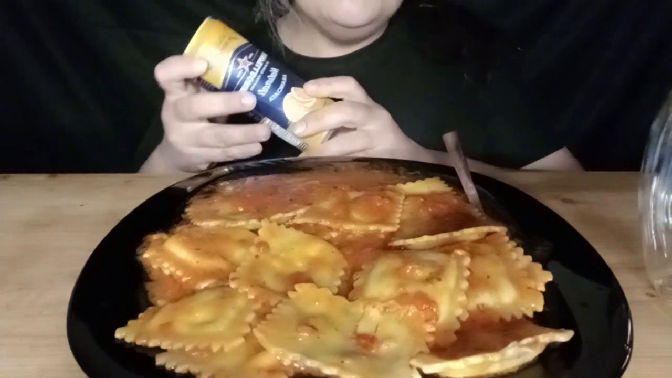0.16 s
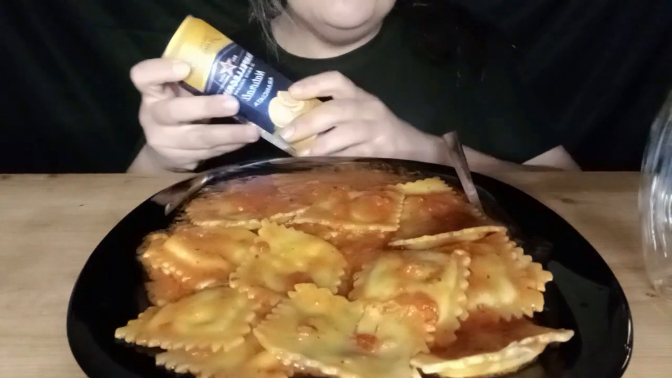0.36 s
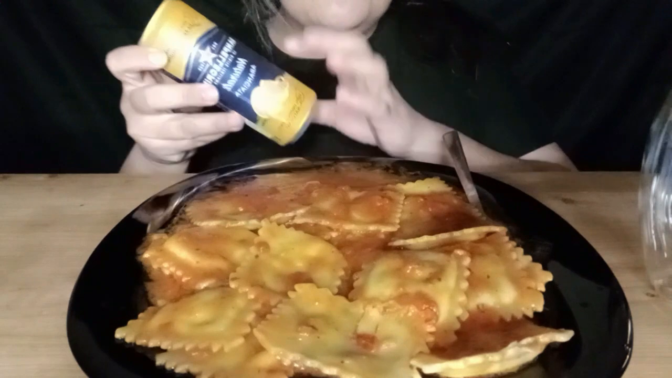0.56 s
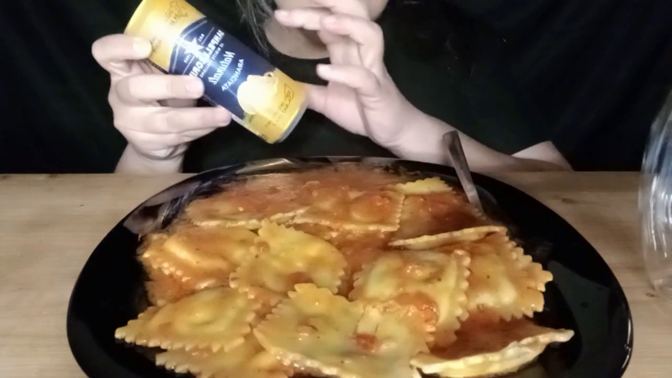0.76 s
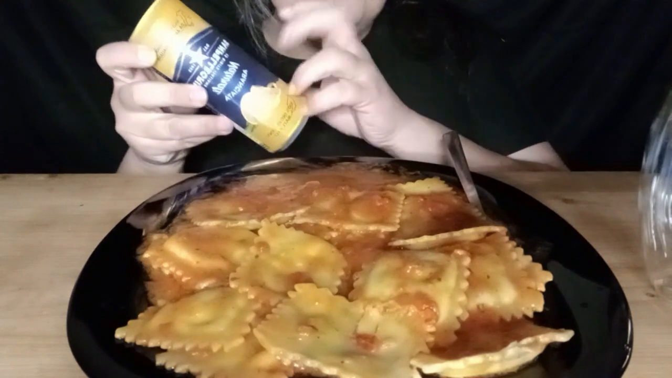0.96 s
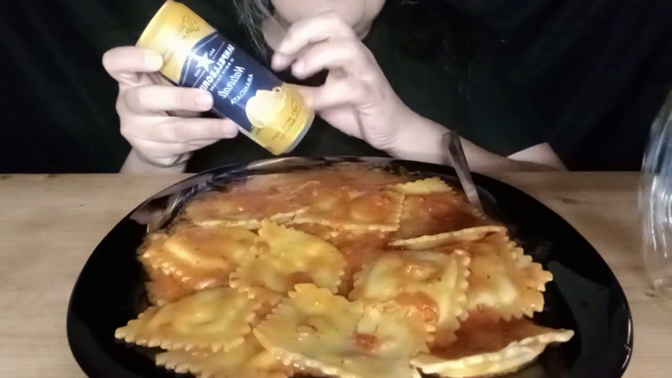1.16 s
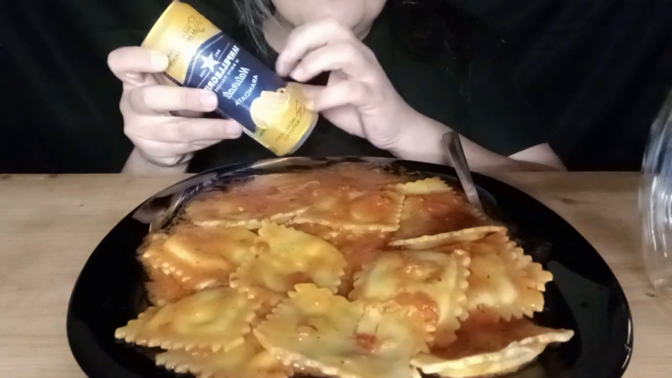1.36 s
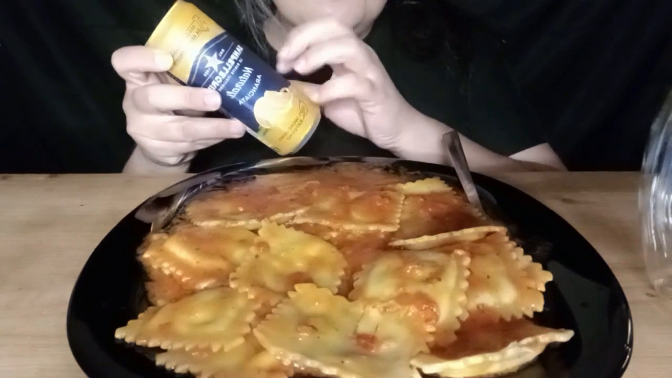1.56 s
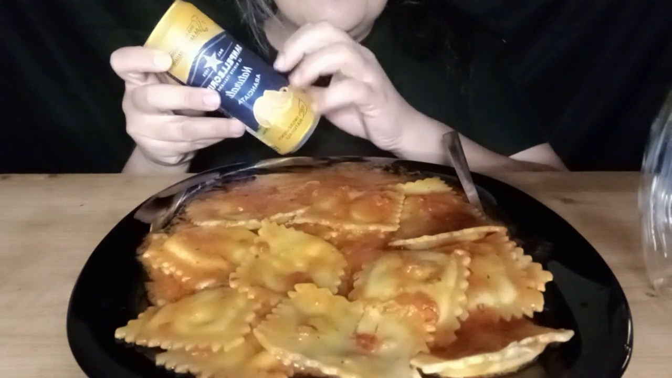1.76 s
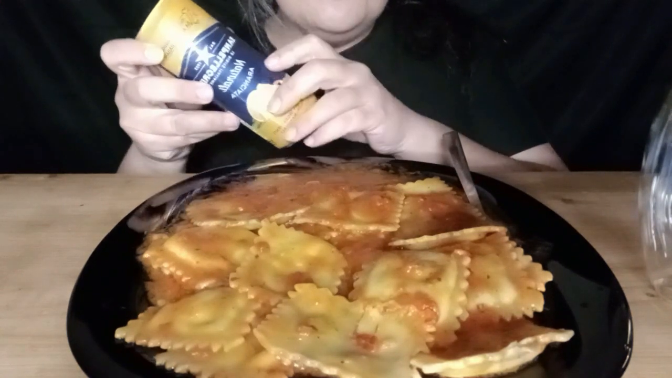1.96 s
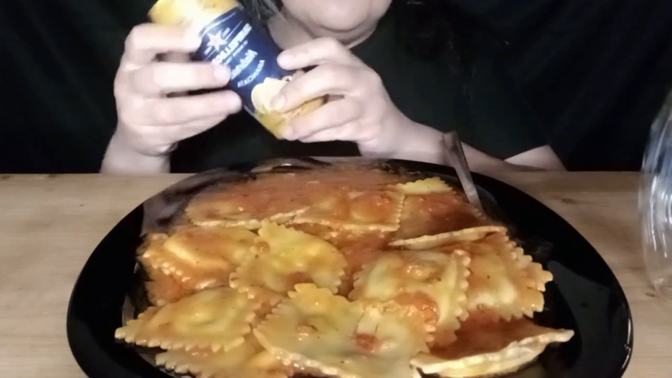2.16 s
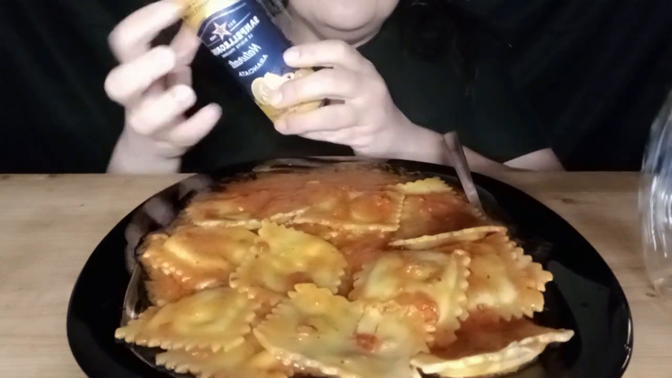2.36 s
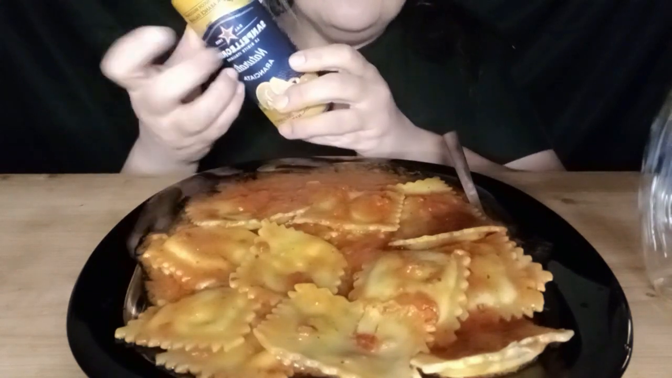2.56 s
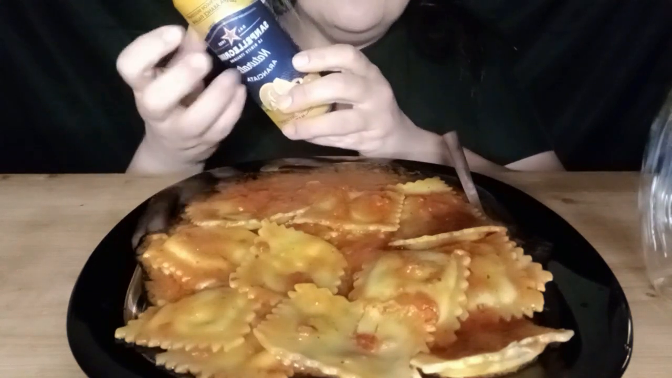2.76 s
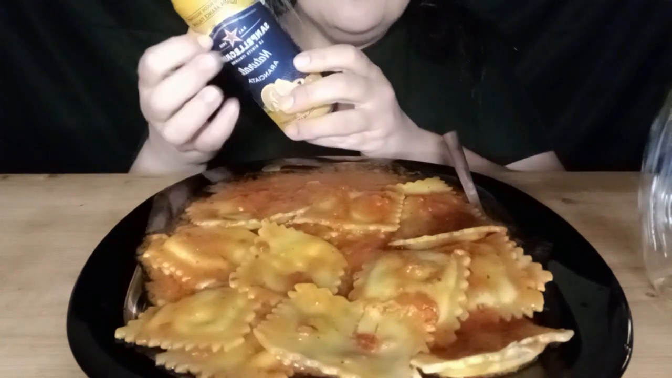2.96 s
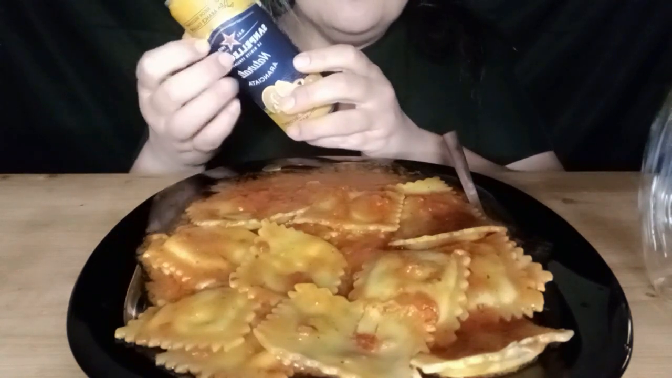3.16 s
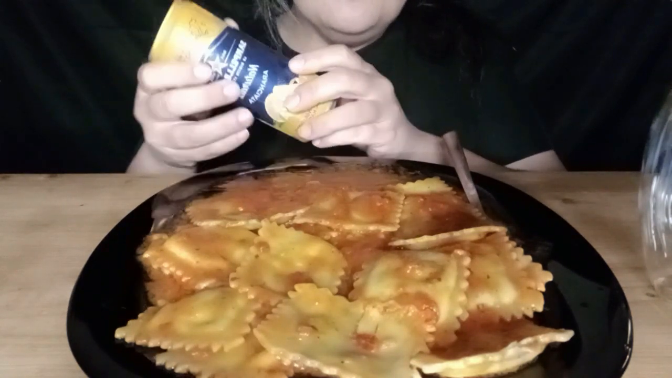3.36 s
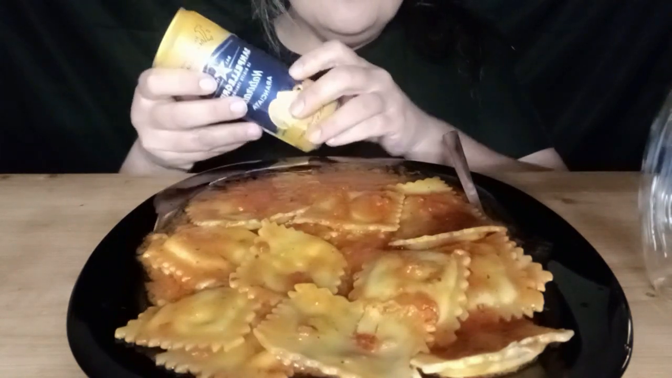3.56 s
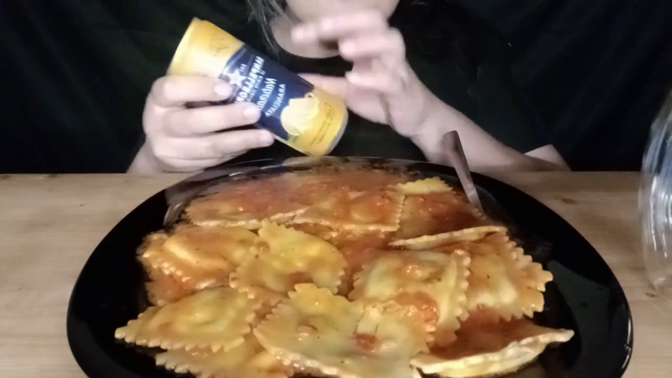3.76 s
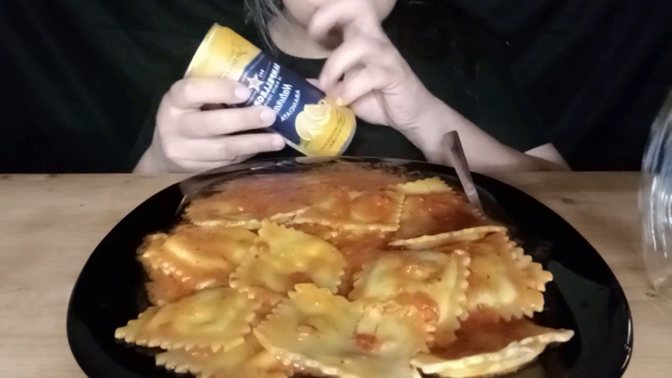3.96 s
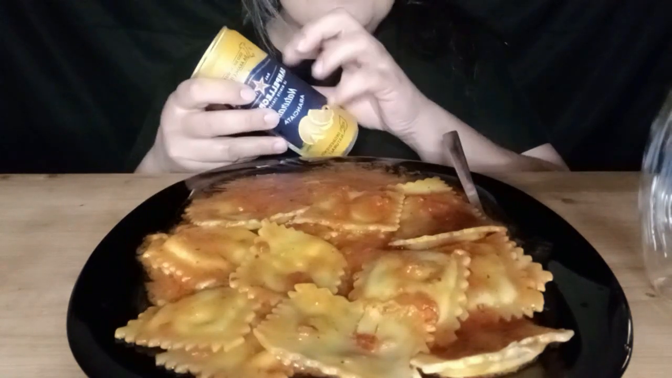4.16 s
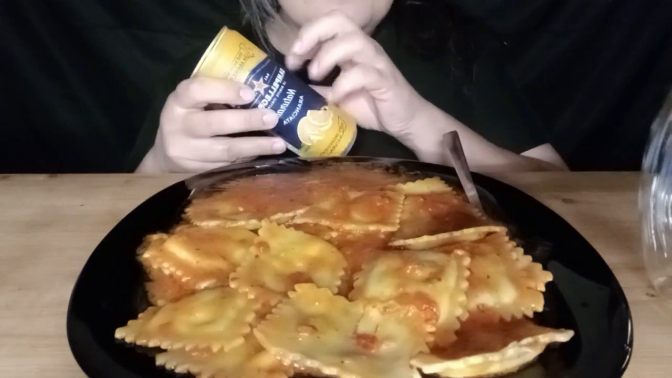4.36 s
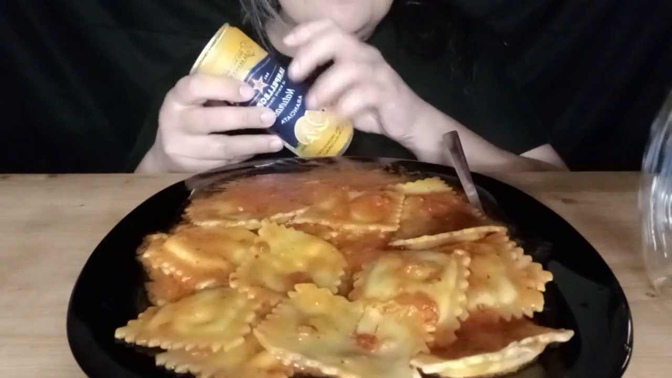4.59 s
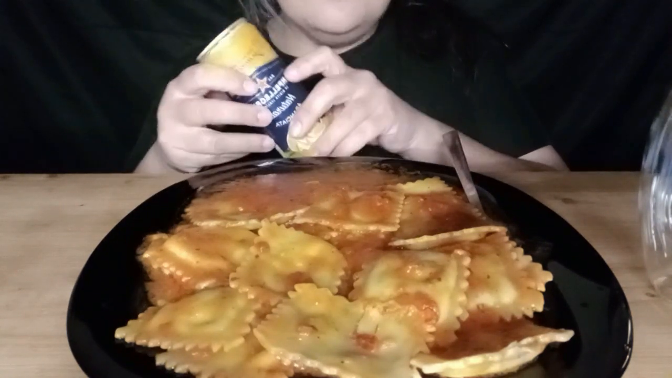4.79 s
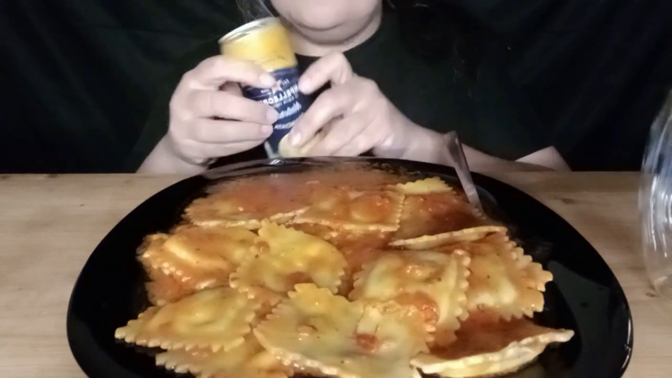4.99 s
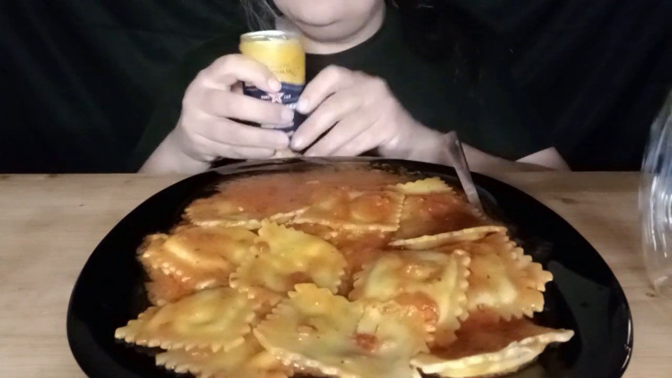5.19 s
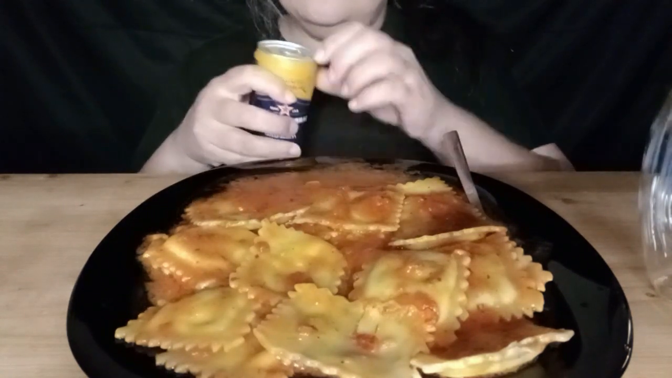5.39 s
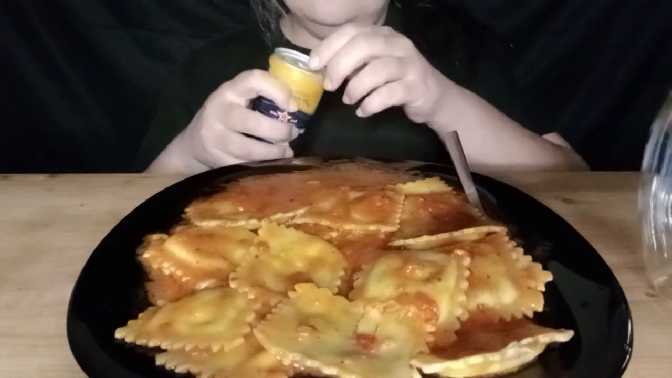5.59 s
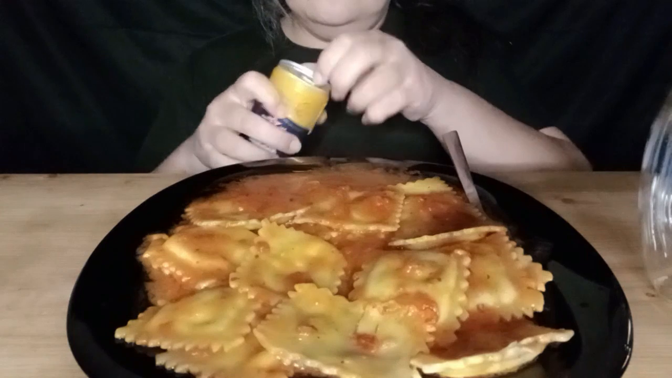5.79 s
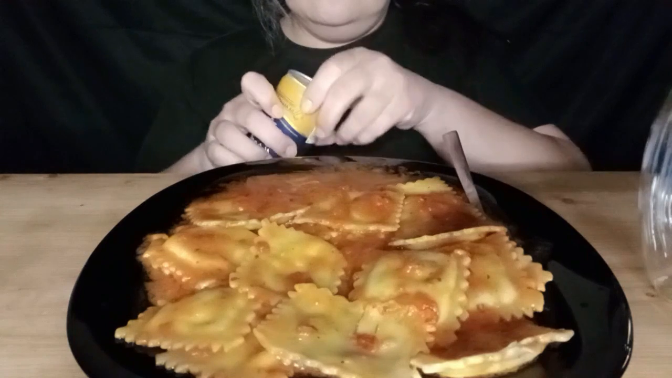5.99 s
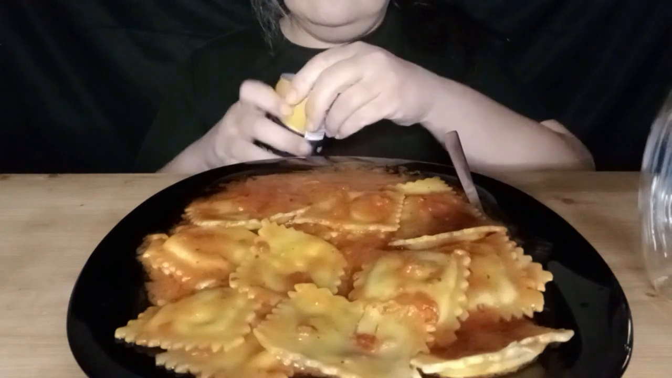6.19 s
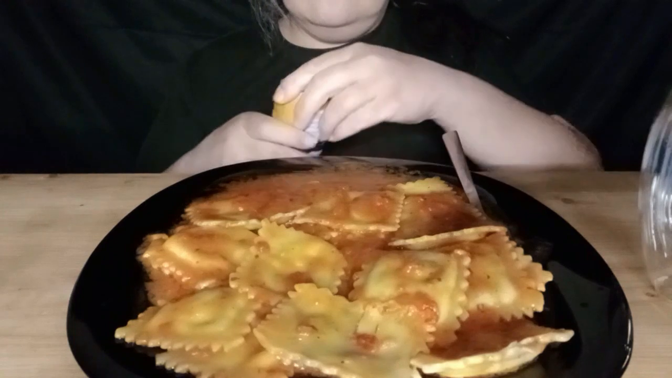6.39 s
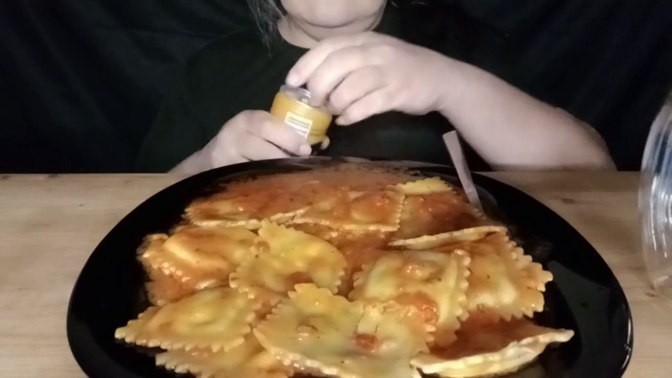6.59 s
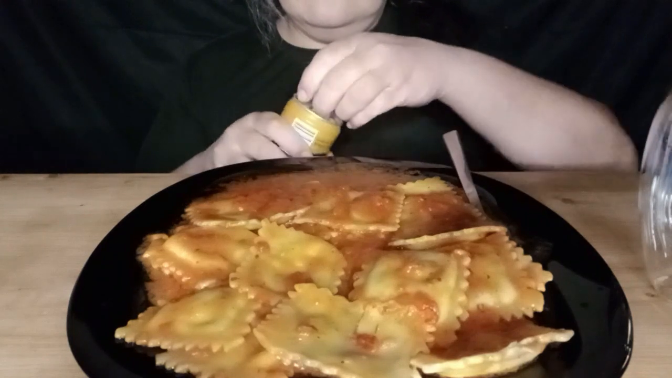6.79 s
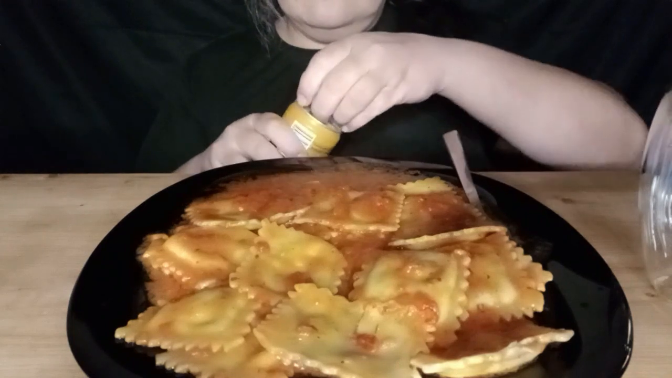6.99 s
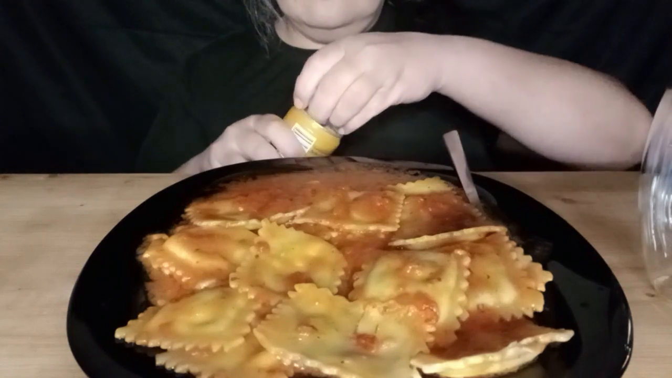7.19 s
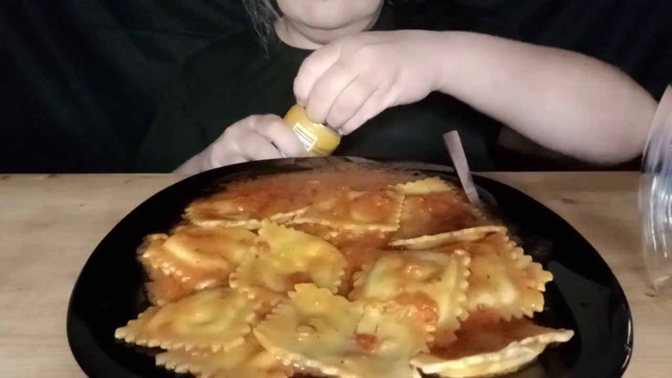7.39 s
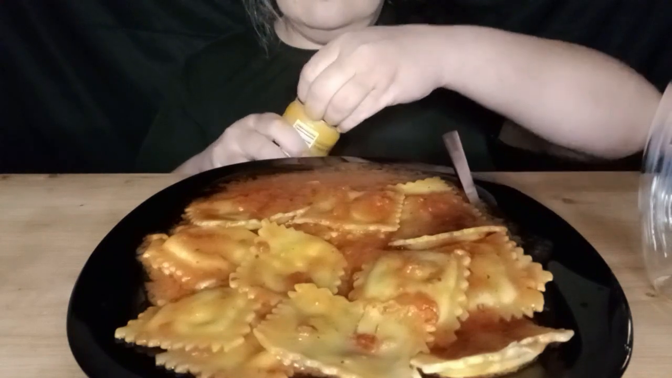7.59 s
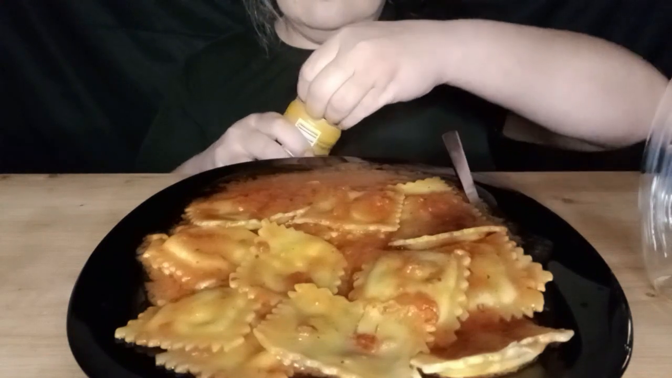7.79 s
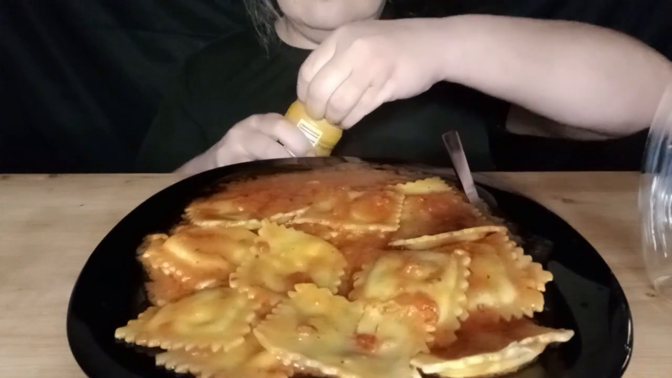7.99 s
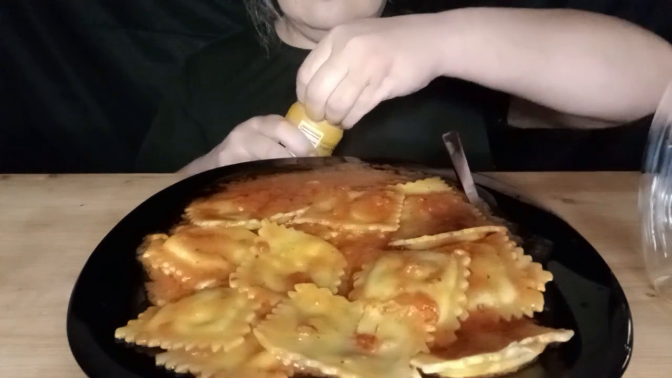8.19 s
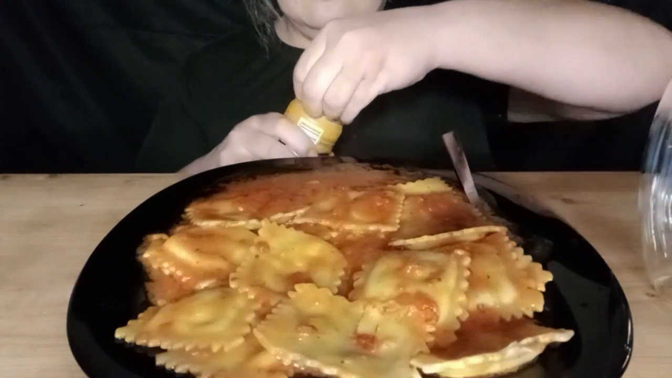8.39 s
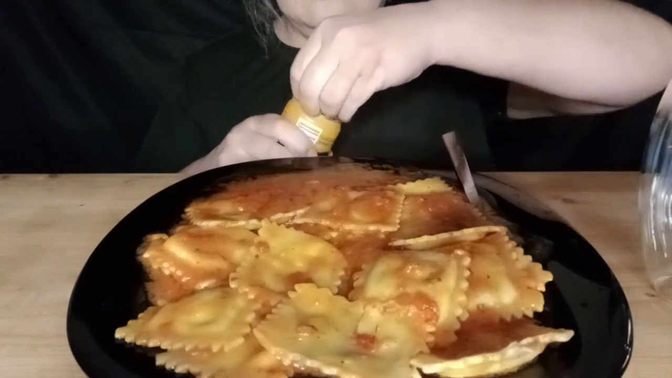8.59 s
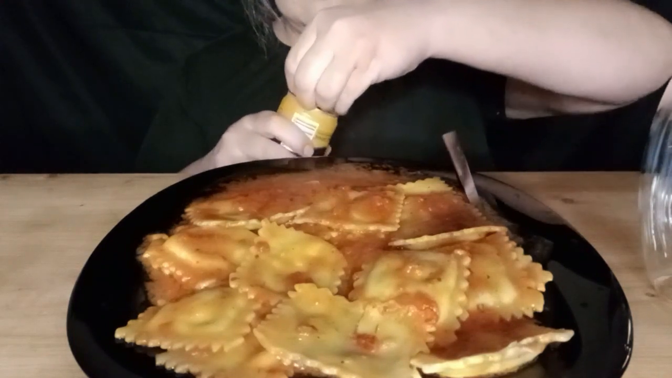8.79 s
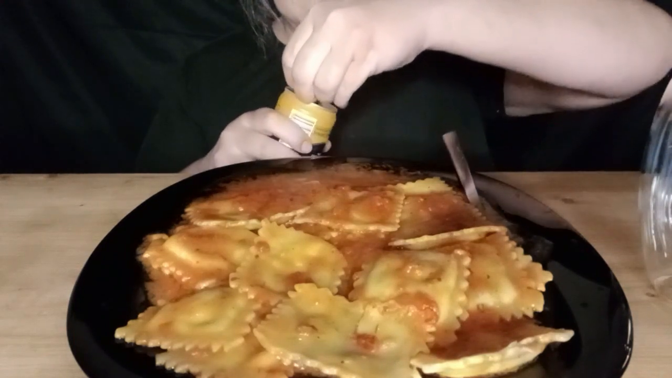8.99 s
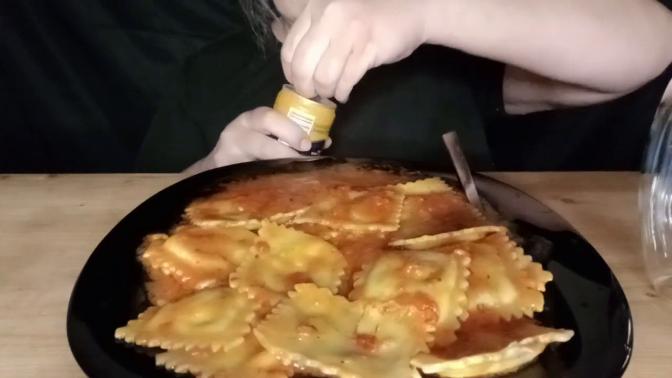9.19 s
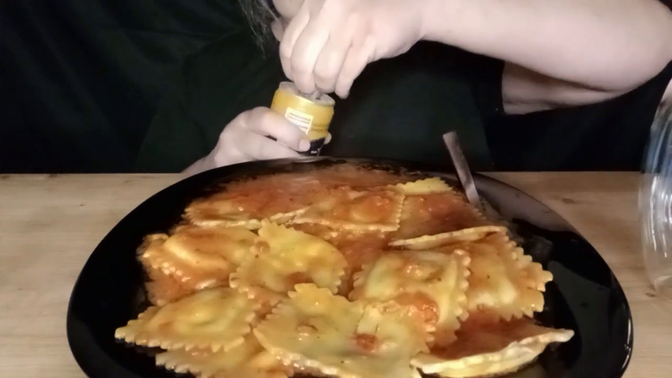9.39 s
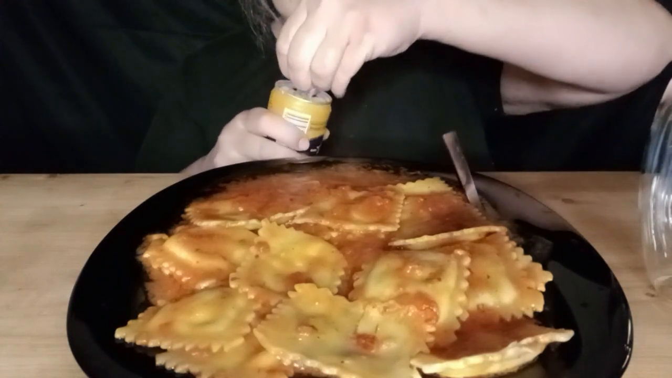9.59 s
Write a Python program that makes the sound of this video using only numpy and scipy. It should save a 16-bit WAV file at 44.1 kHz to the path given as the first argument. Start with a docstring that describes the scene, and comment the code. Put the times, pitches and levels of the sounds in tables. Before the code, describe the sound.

Very close stereo microphone in a quiet, lively room with faint air noise and hum. Fingernails tap a full aluminium can in irregular, rapid clusters, crisp clicks with short dull metallic ringing. Fingers slide and regrip, a nail picks softly at the tab. The seal cracks, gas hisses in a fast swell, the lid pops, froth fizzes, and the flap bends and snaps down very loudly.

```python
"""Fingernails tap an aluminium drink can, close to a stereo microphone in a quiet, rather live room:
clicks excite decaying modes of the full can, and faint hollow tones sound as the can is tilted.
Fingers then slide and regrip, and a nail picks at the ring-pull. The seal cracks, gas hisses out as a
swelling noise jet, the lid pops, and froth spits in noise bursts. Last the flap is levered down: the lid
rings as it bends, then in two snaps that overload the microphone. Air noise and mains hum run throughout."""
import sys
import numpy as np
from scipy import signal
from scipy.fft import rfft, irfft
from scipy.io import wavfile

SR = 44100
rng = np.random.default_rng(int(sys.argv[2]) if len(sys.argv) > 2 else 0)


def to_wav(s):
    """Save 16-bit WAV."""
    ch = np.atleast_2d(s).T  # columns
    pcm = np.round(np.clip(ch, -1, 1) * 32767)  # PCM
    wavfile.write(sys.argv[1], SR, pcm.astype(np.int16))


N = 425565
TIME = np.arange(N) / SR

# Spectrum of the room air: f/Hz, relative level/dB
AIR_COLOUR = [(10, -23), (25, -0.5), (50, 4.5), (75, -4.5), (100, -1.5), (130, -7.5), (240, -6), (350, -9),
              (500, -13), (740, -17.5), (1100, -18.5), (2000, -21), (3500, -25.5), (6000, -27.5),
              (16000, -31)]
AIR_DB = -58.5
HUM_HZ, HUM_DB = 100.3, -62.5
# Reverberation time of the room by band: f/Hz, t60/s
ROOM_T60 = [(150, 0.56), (700, 1), (2000, 0.79), (4000, 0.68), (8000, 0.44), (15000, 0.42)]
# Reflections from nearby surfaces: delay t/s, relative level/dB
ECHOES = [(.0059, -5.5), (0.013, -15.5), (.017, -21)]
BAND_LIMIT_HZ = 16100

# Faint hollow tones while the can is tilted, probably the air pocket above the drink:
# t/s, length/s, f/Hz, level/dB
TILTS = [(1.18, 0.13, 497, -67), (1.76, 0.35, 347, -67), (2.01, 0.18, 505, -64), (2.22, 0.31, 360, -64)]
POCKET_WIDTH_HZ = 22

# Strokes of the fingers sliding on the can: t/s, level/dB
STROKES = [(6.10, -52.5), (6.372, -55.5), (6.50, -55)]
STROKE_RISE_S, STROKE_T60_S = 0.017, 0.61
# Spectrum of the sliding skin: f/Hz, relative level/dB
SLIDE_COLOUR = [(400, -6), (1200, -3), (4000, -6), (7500, 2.5), (10000, -4.5), (16000, -10)]
# Dull bumps of the arms shifting at the table: t/s, level/dB
BUMPS = [(5.56, -46.5), (5.70, -52), (8.665, -46), (8.828, -37.5), (8.885, -46), (8.935, -44), (9.0, -49)]
BUMP_RISE_S, BUMP_T60_S = 0.022, 0.65
# Spectrum of the bumps: f/Hz, relative level/dB
RUMBLE_COLOUR = [(30, -12), (70, -9), (110, 3.5), (190, -3), (300, -17.5), (600, -30), (1500, -30.5),
                 (5000, -54)]

# Soft knocks of the fingers taking a new grip: t/s, ring level/dB, main ring f/Hz, attack level/dB
KNOCKS = [(0.120, -55.5, 1112, -67), (3.528, -45.5, 1410, -49), (6.190, -50.5, 1183, -48.5),
          (6.316, -52, 1248, -58.5)]
# Can modes beside the main ring: f/Hz, level relative to it/dB, t60/s
KNOCK_MODES = [(1080, -2, 0.048), (2320, -20, 0.13), (3230, -17, .05)]
# Spectrum of the knock's noisy attack: f/Hz, relative level/dB
KNOCK_COLOUR = [(300, -7), (1100, -9), (1700, -6), (2500, 6.5), (3500, -0.5), (5000, -9), (7500, -7),
                (10000, -33), (16000, -30)]
# A nail picking under the ring-pull: t/s, tick level/dB, tab ping level/dB
PICKS = [(6.785, -52, -55), (6.828, -51, -60), (7.082, -55, -62), (7.248, -49.5, -50.5), (7.302, -60, -68),
         (7.455, -62, -72), (7.62, -59, -72), (7.77, -61, -72), (7.881, -52, -67), (7.9, -56, -70)]
# Spectrum of the tick: f/Hz, relative level/dB
PICK_COLOUR = [(300, -35), (1500, -4), (4000, -6.5), (6000, 1), (8000, 2), (11000, -14), (16000, -12)]
LID_UNDER_TICK_DB = -14

# The jet leaks as the seal cracks, swells as the crack widens, sags, and dies once the lid pops
LEAK_S, WIDE_S, VENTED_S = 8.24, 8.412, 8.522
LEAK_DB, WIDE_DB = -32, -16.5  # before the common gas gain in scene()
SWELL_POWER, SAG_DB_PER_S, JET_T60_S = 2.25, 11, 0.088
# Spectrum of the jet: f/Hz, relative level/dB
JET_COLOUR = [(200, -33.5), (900, -25.5), (2200, -24), (3100, -17.5), (3900, -8), (5600, -6.5),
              (7000, -4.5), (8200, 2), (9400, -5.5), (11000, -2.5), (13500, 1), (16000, -5.5)]
# Spits of froth: t/s, level before the common gas gain/dB
SPITS = [(8.555, -38), (8.668, -36.5), (8.828, -35.5), (8.982, -39.5), (9.125, -42), (9.52, -40)]
SPIT_RISE_S, SPIT_T60_S = 0.015, 0.51
# Spectrum of the froth: f/Hz, relative level/dB
FROTH_COLOUR = [(300, 1.5), (900, -9), (1500, -9.5), (2000, -9), (2700, -4.5), (4200, -5), (6500, 0.5),
                (9500, -4.5), (13000, -8.5), (16000, -12.5)]

# Lid modes as the seal cracks, as it pops, as the flap bends and as it snaps home:
# f/Hz, relative level/dB, t60/s, extra level sent to the room/dB
SEAL = [(1166, -17, 0.027, 0), (1936, -22, 0.04, 11.5), (2710, -21.5, 0.013, -1), (4760, -3.5, 0.015, 8),
        (6060, -8, 0.0079, 18.5), (7400, 7.5, 0.0077, 3)]
POP = [(892, -13.5, 0.017, 3), (1150, -2.5, 0.011, -0.5), (1450, 0.5, 0.01, 1.5), (1895, -6.5, 0.013, 9.5),
       (2210, -7.5, 0.015, 11), (2930, -5, 0.0042, 7.5), (3620, -6, 0.0069, 9.5), (3970, 2, 0.0062, 5.5),
       (4380, -2, 0.0094, 9), (6140, -15.5, 0.00799, 16), (8250, -6.5, 0.008, 2)]
BEND = [(1180, -22.5, 0.0084, -4), (1870, -32, 0.013, 15.5), (3840, -10, 0.022, 4), (4296, -2.5, 0.022, -2),
        (5970, -5.5, 0.0049, 12), (7550, 0.5, 0.0035, 5), (12800, -1, 0.0015, 15)]
SNAP = [(249, -29.5, 0.024, 5.5), (670, -24, 0.012, 8), (1080, -16, 0.012, -3), (1525, -17, 0.0089, 9),
        (2030, -21.5, 0.021, 7), (2610, -10.5, 0.0054, 3), (3635, -2.5, 0.011, 5.5), (4165, 2, 0.013, -4.5),
        (4990, -20, 0.013, 14), (5650, -4, 0.0071, 0), (6580, -7.5, 0.0041, 1)]
# Jerks of the ring-pull: t/s, ring level/dB, tearing crack level/dB, crack t60/s, lid modes (a table above)
JERKS = [(8.2368, -15, -15.5, 0.0083, SEAL), (8.518, -1.5, -7.5, 0.03, POP),
         (9.2049, -12.5, -26, .009, BEND), (9.2094, -7, -11.5, 0.019, BEND),
         (9.4245, -3.5, -5.5, 0.0094, SNAP), (9.4355, 6, 1, 0.025, SNAP)]
# Spectrum of tearing metal: f/Hz, relative level/dB
TEAR_COLOUR = [(200, -40), (1000, -14), (2600, -13), (4500, 9), (8200, 0), (10000, -2), (13000, -3.5),
               (16000, -11)]

# Nail taps: t/s, strength level/dB, extra hardness of the click/dB
TAPS = [(0.969, -47, -6), (1.0191, -24, -2), (1.1022, -34.5, -4), (1.1355, -23, -0.5),
        (1.1414, -26.5, -3.5), (1.272, -26, -9), (1.2997, -24, -2), (1.3321, -27, -1.5), (1.35, -23.5, -5),
        (1.4702, -24.5, -9), (1.5479, -23, -6), (1.6879, -26, -0.5), (1.6983, -25.5, -1.5),
        (1.716, -22, -9), (1.7251, -29, -2), (1.7391, -25.5, -6), (2.593, -25.5, -8), (2.6526, -21, -9),
        (2.7104, -30, -5.5), (2.8525, -24, -7), (2.8963, -25.5, -5), (2.9846, -27.5, -5),
        (3.1001, -24.5, -13), (3.142, -23, -5), (3.2243, -33, -7.5), (3.9789, -27.5, -0.5),
        (4.0452, -27, -4.5), (4.096, -26, -7), (4.155, -26, -5.5), (4.244, -25.5, -4.5),
        (4.3254, -29.5, -5), (4.3344, -21.5, -6), (4.449, -27.5, 0.5), (4.4666, -26.5, -3),
        (4.5089, -25.5, -6.5), (4.5279, -26.5, -8), (4.6329, -27, -1), (5.452, -41.5, 1)]
# Modes of the full can struck near its base, and near its top: f/Hz, relative level/dB, t60/s
BASE_MODES = [(394, 0, .12), (1062, 4.5, 0.072), (1150, 1, 0.051), (1411, -2, 0.33), (1892, 8, 0.042),
              (2030, -10, 0.27), (2283, -2.5, 0.16), (2620, -6, 0.098), (3010, -6.5, 0.16),
              (3276, 2.5, 0.11), (3810, 4.5, 0.059), (5370, 0, 0.12)]
TOP_MODES = [(245, 3.5, 0.1), (385, -1.5, 0.23), (1130, 0, 0.16), (1520, -4.5, 0.27), (1602, 0, 0.19),
             (1940, 2, 0.13), (2426, -4.5, 0.22), (2760, -14, .06), (3720, 3, 0.14), (4130, 2, 0.048),
             (8000, 7, 0.076)]
TOP_FROM_S, TOP_TO_S = 2.3, 3.4
# Spectra of the nail's click near the base, and near the top: f/Hz, relative level/dB
BASE_CLICK = [(200, -23), (700, -3.5), (1150, 1.5), (2500, -37), (3800, -2.5), (5200, -3.5), (7000, -6),
              (8300, 10.5), (9700, 5.5), (11500, 2.5), (13000, -1), (16000, -16)]
TOP_CLICK = [(200, -7), (1200, 4.5), (2200, -6), (3800, -2), (6000, -19), (8000, 3.5), (10500, -7),
             (12500, 3), (16000, -12)]
# Spectrum of the thin wall's dense rattle: f/Hz, relative level/dB
WALL_COLOUR = [(200, -27), (650, -15), (1100, -15), (1700, -17.5), (2600, -2.5), (4000, -1), (8200, 1.5),
               (11000, -7), (13000, -6.5), (16000, -6.5)]
# A tap of strength FIRM_DB has body gain RING_DB, which moves RING_GROWTH dB per dB of strength
FIRM_DB, RING_DB, RING_GROWTH = -25.5, -57, 0.97


def amp(db):
    """Level to amplitude: 20 dB is a factor of ten."""
    return 10 ** (np.asarray(db) / 20)


def unit(x):
    """Normalisation to rms 1."""
    return x / np.sqrt(np.mean(x ** 2) + 1e-20)


def read(points, hz):
    """Linear interpolation of a table on a logarithmic frequency axis."""
    f, value = np.transpose(points)
    return np.interp(np.log(hz + 1), np.log(f + 1), value)


def add(mix, s, sound):
    """Superposition: a sound is summed into the mix from time s, in place."""
    part = mix[:, round(s * SR):][:, :sound.shape[1]]
    part += sound[:, :part.shape[1]]


def pan(x, left_db):
    """Intensity stereophony: a level difference leans the sound to the left."""
    return x * amp([[left_db / 2], [-left_db / 2]])


def noise(colour, same, size=N, grain_db=0):
    """Filtered random noise; same sets interchannel correlation, grain_db scatters the sample levels."""
    common, *own = rng.standard_normal((3, size))
    x = np.sqrt(same) * common + np.sqrt(1 - same) * np.array(own)
    x = x * amp(grain_db * np.minimum(rng.exponential(1, size), 7))
    response = amp(read(colour, np.fft.rfftfreq(size, 1 / SR)))
    return unit(irfft(rfft(x) * response, size))


def fade(t, t60):
    """Exponential damping: the amplitude falls 60 dB in t60."""
    return np.exp(-np.log(1000) * t / max(t60, 1e-4))


def ring(t, hz, t60, spread):
    """Damped free vibration of one mode, up to spread radians apart in the two channels."""
    phase = spread * rng.uniform(-1, 1) * np.array([[0.5], [-0.5]])
    return np.sin(2 * np.pi * hz * t + phase) * fade(t, t60)


def bursts(rows, rise_s, t60):
    """Power addition of events that share one linear rise and one exponential decay; returns a gain."""
    power = np.zeros(N)
    for s, db in rows:
        age = np.maximum(TIME - s, 0)
        rise = np.minimum(age / rise_s, 1)
        decay = fade(np.clip(age - rise_s, 0, 2), t60)
        power += (amp(db) * rise * decay) ** 2
    return np.sqrt(power)


def background():
    """Stationary noise of the room air, and mains hum under slight phase modulation."""
    rates_hz = np.geomspace(0.2, 3, 12)
    waver = unit(sum(np.sin(2 * np.pi * (f * TIME + rng.random())) for f in rates_hz))
    air = amp(AIR_DB) * noise(AIR_COLOUR, same=0.23)
    hum = amp(HUM_DB) * np.sqrt(2) * np.sin(2 * np.pi * HUM_HZ * TIME + 0.21 * waver)
    return pan(air, left_db=2.5) + pan(hum, left_db=4.0)


def echoes(x, skew_s=0.00007):
    """Specular reflection: delayed copies join the direct sound, slightly later on the right."""
    out = x.copy()
    for delay, db in ECHOES:
        add(out[:1], delay, amp(db) * x[:1])
        add(out[1:], delay + skew_s, amp(db) * x[1:])
    return out


def room(x, build_s=0.0016):
    """Diffuse reverberation: convolution with independent noise tails damped band by band."""
    hz, t, z = signal.stft(rng.standard_normal((2, SR)), SR, nperseg=256)
    build = 1 - np.exp(-t / build_s)
    decay = np.exp(-np.log(1000) * t / read(ROOM_T60, hz)[:, None])
    tail = signal.istft(z * decay * build, SR, nperseg=256)[1]
    return signal.fftconvolve(x, tail / np.linalg.norm(tail[0]), axes=1)[:, :N]


def air_pocket():
    """Resonance: noise through one narrow band, swelling and fading as the drink shifts."""
    out = np.zeros((2, N))
    for s, length, hz, db in TILTS:
        size = round(length * SR)
        offset_hz = np.fft.rfftfreq(size, 1 / SR) - hz
        resonance = 1 / (1 + (offset_hz / POCKET_WIDTH_HZ) ** 4)
        tone = unit(irfft(rfft(rng.standard_normal(size)) * resonance, size))
        swell = np.sin(np.linspace(0, np.pi, size))
        add(out, s, pan(amp(db) * swell * tone, left_db=1.0))
    return out


def hands():
    """Friction noise of skin sliding over the can, and low-frequency noise of the arms shifting."""
    slide = bursts(STROKES, STROKE_RISE_S, STROKE_T60_S) * noise(SLIDE_COLOUR, same=0.17, grain_db=2.5)
    rumble = bursts(BUMPS, BUMP_RISE_S, BUMP_T60_S) * noise(RUMBLE_COLOUR, same=0.78)
    return pan(slide + rumble, left_db=0.5)


def handling(knock_t60=0.14, tab_hz=5850, lid_hz=1165):
    """Impact excitation: finger pads knock the can dully; a nail's tick makes tab and lid ring."""
    out, t = np.zeros((2, N)), np.arange(2 ** 13) / SR
    contact = 1 - fade(t, 0.0055)
    for s, db, hz, attack_db in KNOCKS:
        body = ring(t, hz, knock_t60, spread=0.55)
        for mode_hz, mode_db, t60 in KNOCK_MODES:
            body = body + amp(mode_db) * ring(t, mode_hz, t60, spread=0.6)
        attack = noise(KNOCK_COLOUR, same=0.91, size=len(t)) * fade(t, 0.095)
        add(out, s, contact * (amp(db) * body + amp(attack_db) * attack))
    for s, tick_db, tab_db in PICKS:
        tick = amp(tick_db) * noise(PICK_COLOUR, same=0.4, size=len(t)) * fade(t, 0.027)
        tab = amp(tab_db) * ring(t, tab_hz, 0.049, spread=0.8)
        lid = amp(tick_db + LID_UNDER_TICK_DB) * ring(t, lid_hz, 0.054, spread=0.6)
        add(out, s, contact * (tick + tab + lid))
    return pan(out, left_db=1.0)


def gas():
    """Jet noise grows with the opening and sags with pressure; bursting froth adds grainy noise."""
    opening = np.clip((TIME - LEAK_S) / (WIDE_S - LEAK_S), 0, 1) ** SWELL_POWER
    flow = (TIME >= LEAK_S) * fade(np.maximum(TIME - VENTED_S, 0), JET_T60_S)
    sag_db = SAG_DB_PER_S * np.maximum(TIME - WIDE_S, 0)
    jet_db = LEAK_DB + (WIDE_DB - LEAK_DB) * opening - sag_db
    jet = amp(jet_db) * flow * noise(JET_COLOUR, same=0.41, grain_db=-0.2)
    froth = bursts(SPITS, SPIT_RISE_S, SPIT_T60_S) * noise(FROTH_COLOUR, same=0.32, grain_db=3)
    return pan(jet + froth, left_db=0.5)


def taps(click_db=1, rattle_db=-13.0, rattle_t60=0.064, contact_t60=0.0051, click_t60=0.0084):
    """Modal excitation by impact: a nail clicks, the thin wall rattles, liquid-damped modes ring on."""
    out, t = np.zeros((2, N)), np.arange(2 ** 14) / SR
    contact, release = 1 - fade(t, contact_t60), fade(t, click_t60)
    for s, strength_db, hard_db in TAPS:
        # for a while the other hand taps, near the top of the can
        near_top = TOP_FROM_S < s < TOP_TO_S
        modes, colour = (TOP_MODES, TOP_CLICK) if near_top else (BASE_MODES, BASE_CLICK)
        click = amp(click_db + hard_db) * noise(colour, same=0.77, size=len(t)) * release
        rattle = amp(rattle_db) * noise(WALL_COLOUR, same=0.57, size=len(t)) * fade(t, rattle_t60)
        body = 0
        for hz, db, t60 in modes:
            # every nail lands on a different spot, which weights the modes; the grip detunes them a little
            spot = rng.choice([-1, 1]) * amp(2.5 * rng.normal())
            detune = rng.normal(1, 0.008)
            body = body + spot * amp(db) * ring(t, hz * detune, t60, spread=0.42)
        body_db = RING_DB + RING_GROWTH * (strength_db - FIRM_DB)
        strike = amp(strength_db) * pan(click + rattle, left_db=2.0)
        add(out, s, contact * (strike + amp(body_db) * body))
    return out


def ring_pull():
    """Fracture noise and plate modes of the lid at each jerk; returns microphone and room signals."""
    near, far, t = np.zeros((2, N)), np.zeros((2, N)), np.arange(2 ** 12) / SR
    rise = 1 - fade(t, 0.00047)
    for s, ring_db, crack_db, crack_t60, modes in JERKS:
        crack = amp(crack_db) * noise(TEAR_COLOUR, same=0.44, size=len(t)) * fade(t, crack_t60)
        near_jerk, far_jerk = crack.copy(), crack.copy()
        for k, (hz, db, t60, room_db) in enumerate(modes):
            # neighbouring modes of the lid start in opposite directions
            mode = (-1) ** k * amp(ring_db + db) * ring(t, hz, t60, spread=0.8)
            near_jerk += mode
            far_jerk += amp(room_db) * mode
        add(near, s, rise * near_jerk)
        add(far, s, rise * far_jerk)
    return pan(near, left_db=1.5), far


def scene(tap_room_db=-9, lid_room_db=-11, gas_room_db=-12, tap_echo=0.89, gas_db=-1):
    """Superposition of direct sound, early reflections and reverberation."""
    fingers = taps() + handling()
    lid, lid_far = ring_pull()
    hiss = amp(gas_db) * gas()
    send = amp(tap_room_db) * fingers + amp(lid_room_db) * lid_far + amp(gas_room_db) * hiss
    # the fingers keep their full direct sound but reflect a little less
    near = echoes(lid + hiss + tap_echo * fingers) + (1 - tap_echo) * fingers
    return near + room(send) + hands() + background() + air_pocket()


def record(dry):
    """Saturation: peaks are limited at full scale; a linear-phase low-pass then limits the band."""
    clipped = dry / (1 + dry ** 8) ** (1 / 8)
    low_pass = signal.firwin(255, BAND_LIMIT_HZ, window=("kaiser", 8), fs=SR)
    return signal.oaconvolve(clipped, low_pass[None], "same")


dry = scene()
out = record(dry)
to_wav(out)
```